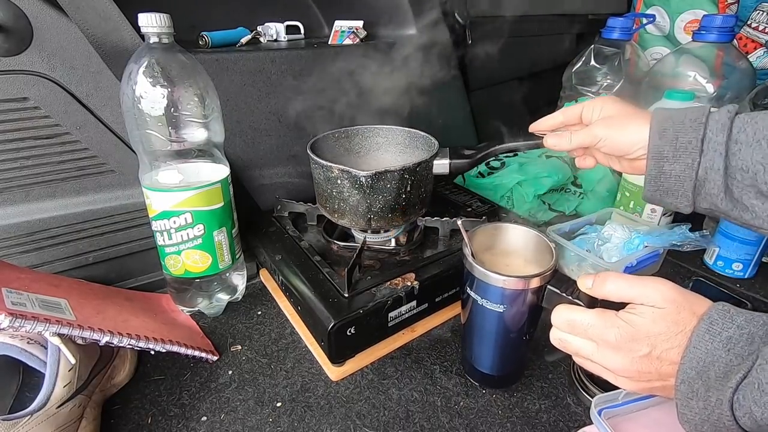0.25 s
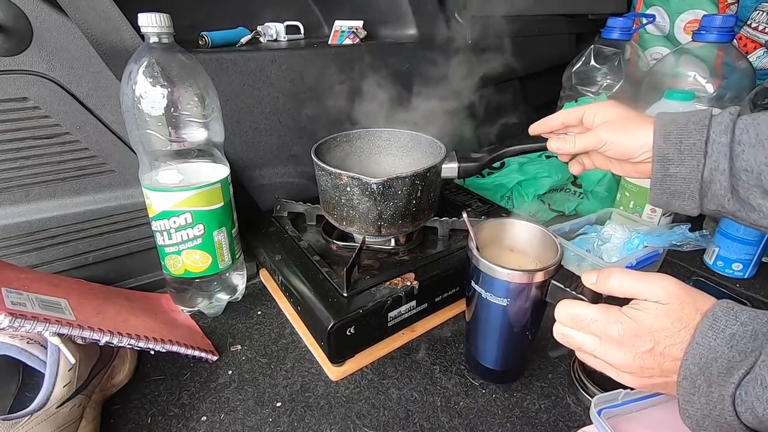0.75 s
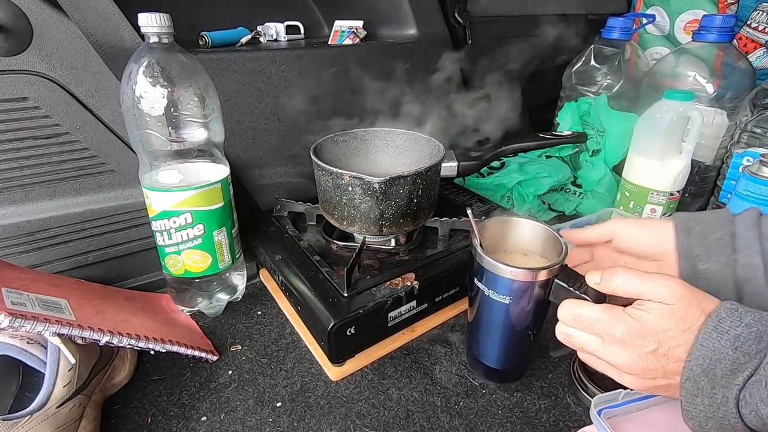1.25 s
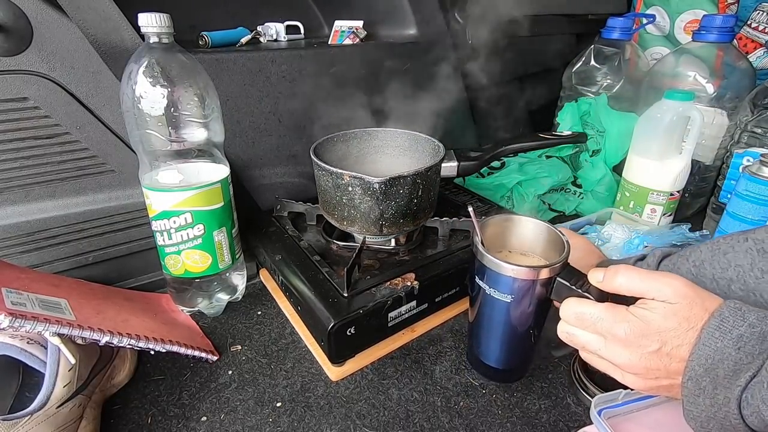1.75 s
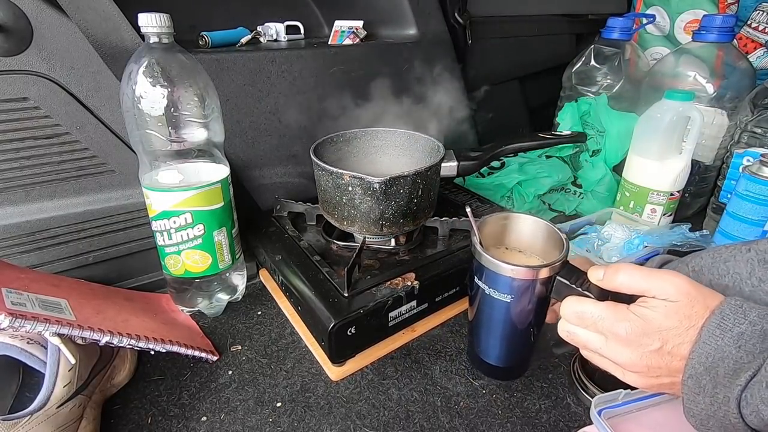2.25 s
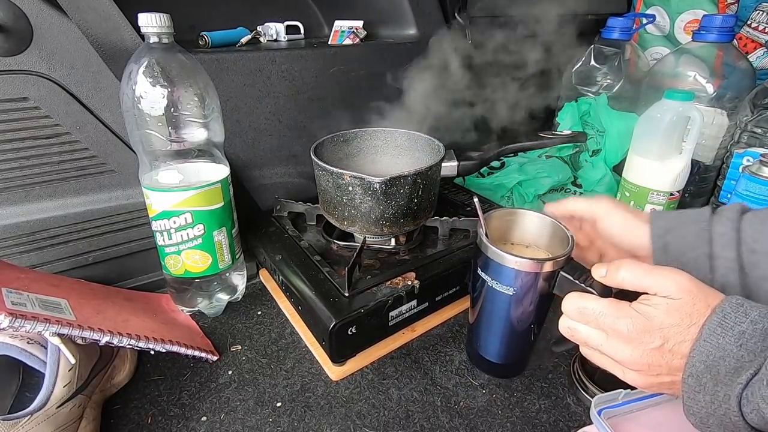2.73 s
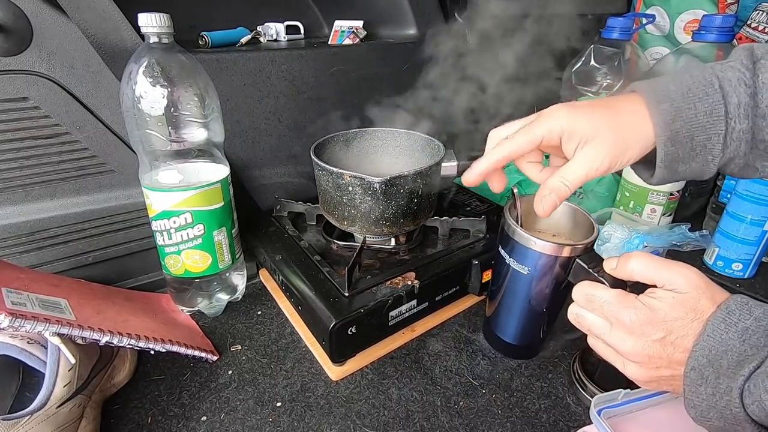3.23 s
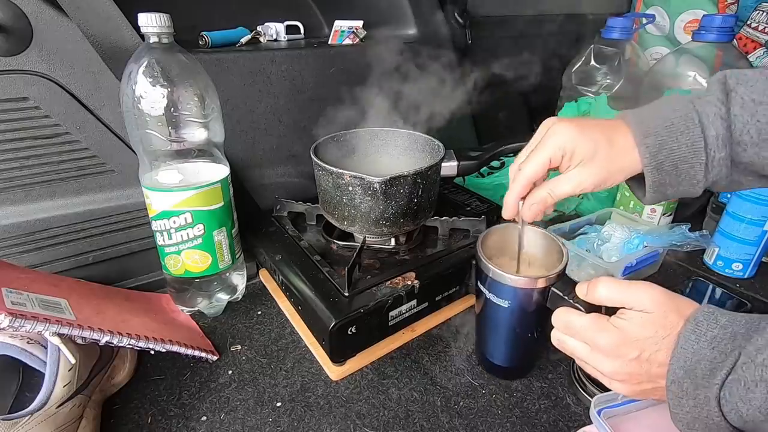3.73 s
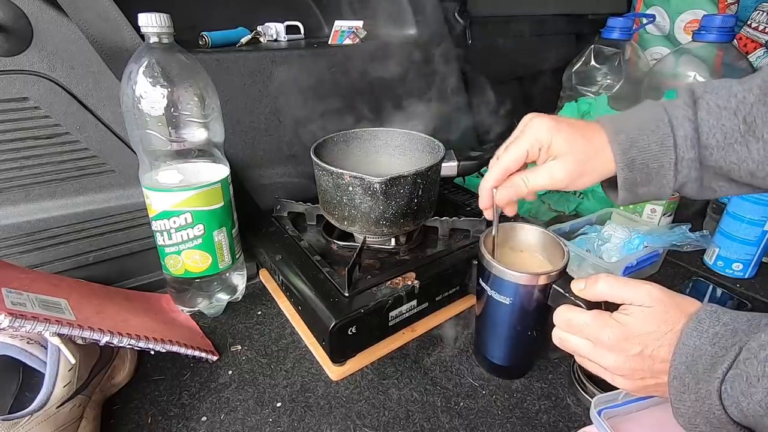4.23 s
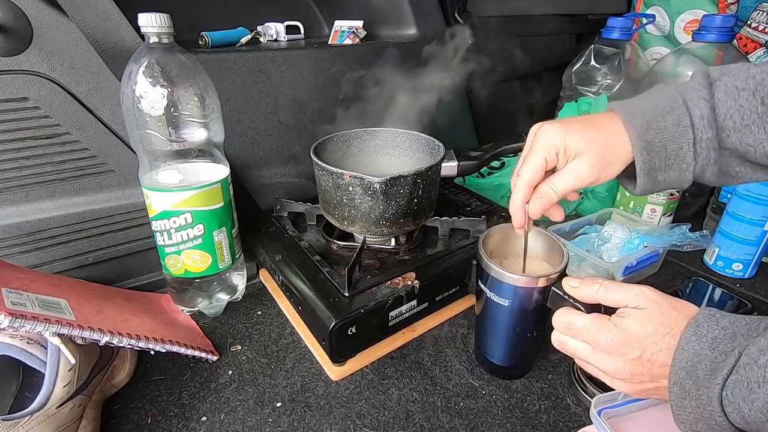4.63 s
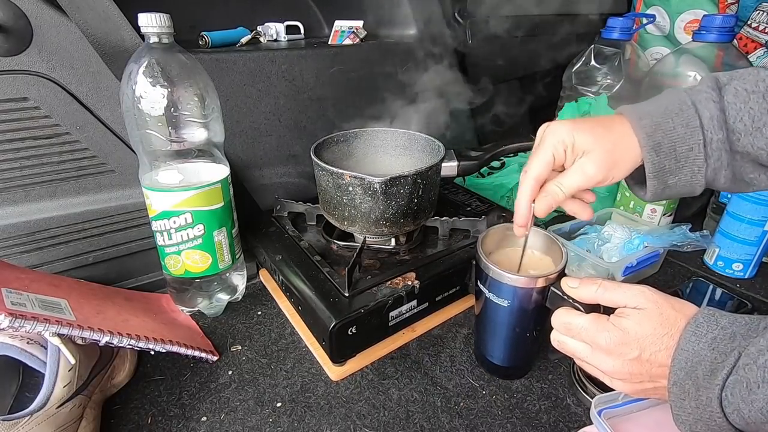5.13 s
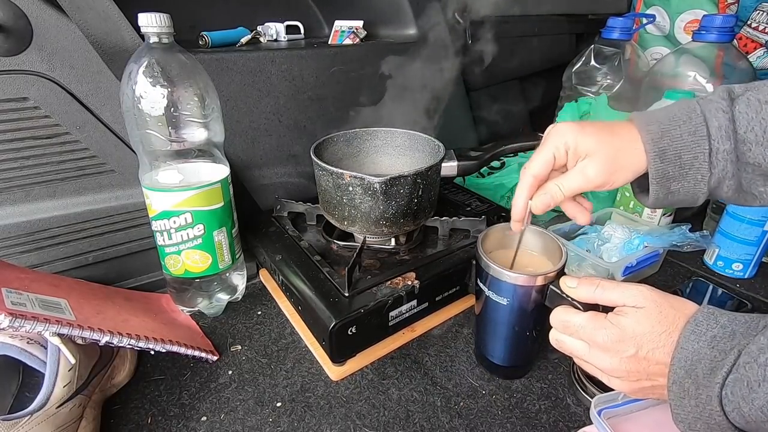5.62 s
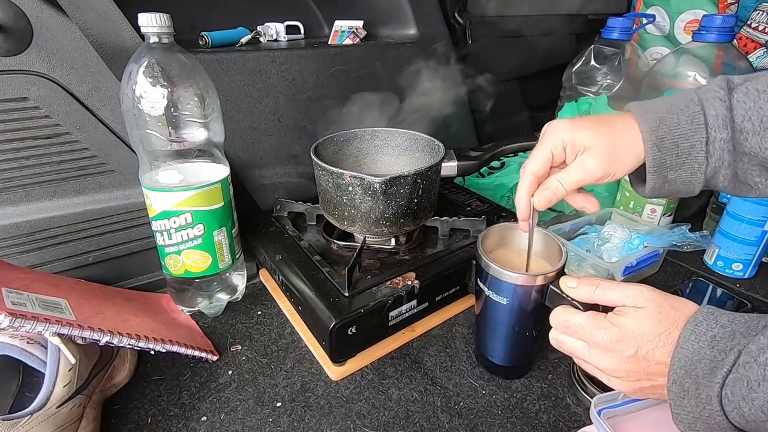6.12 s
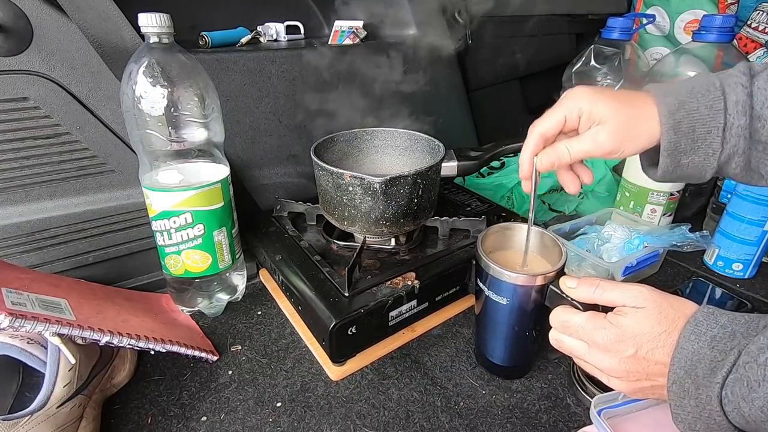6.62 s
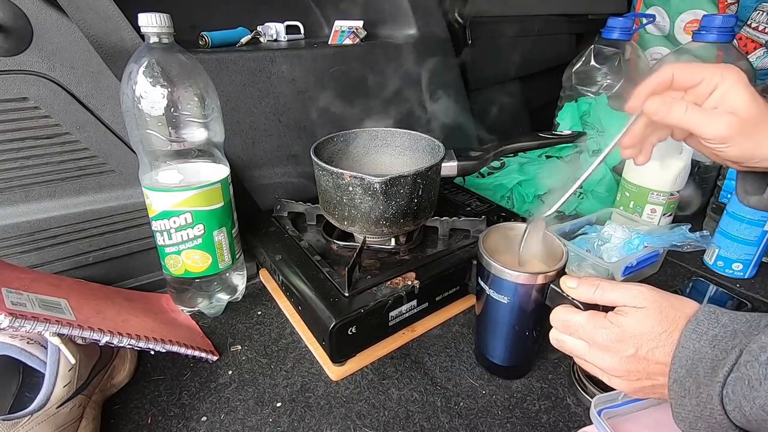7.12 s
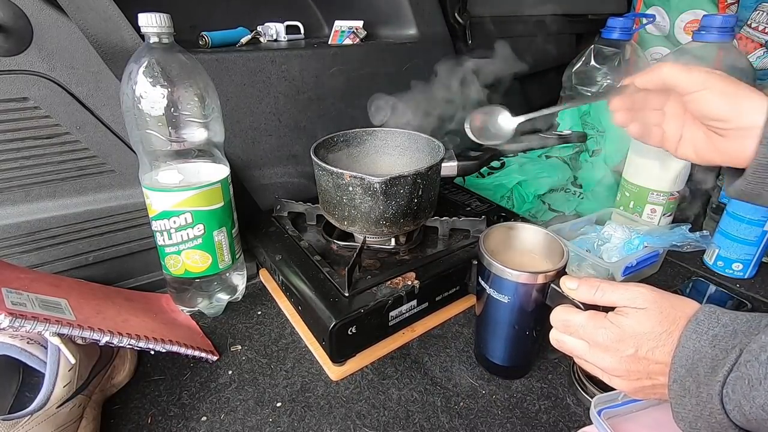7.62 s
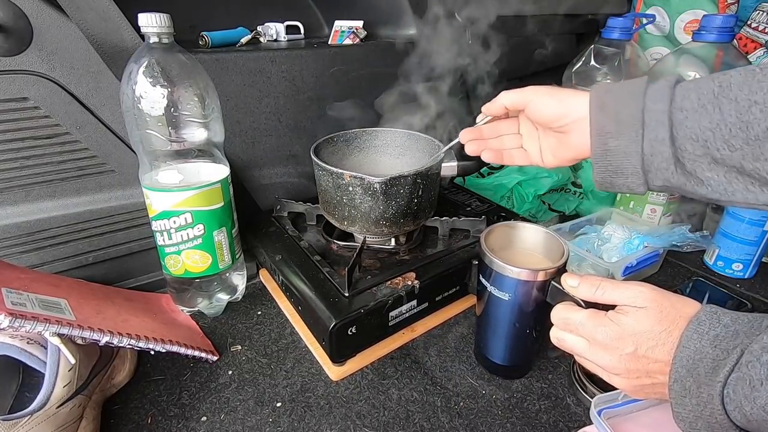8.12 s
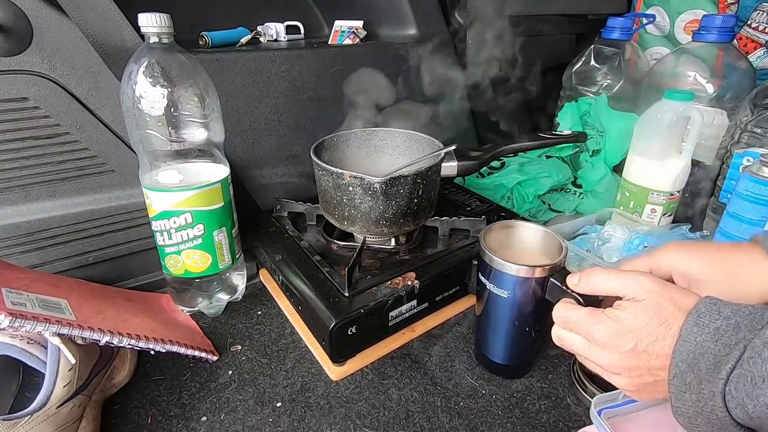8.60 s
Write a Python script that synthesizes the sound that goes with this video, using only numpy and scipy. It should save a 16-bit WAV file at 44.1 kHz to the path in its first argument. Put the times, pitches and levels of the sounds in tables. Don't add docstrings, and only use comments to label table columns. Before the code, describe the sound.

A hot pan rattles onto a stove grate, then a spoon stirs a full steel mug, taps its rim twice and clatters into the pan.

```python
import sys
import numpy as np
from scipy import signal
from scipy.io import wavfile

SR = 44100
rng = np.random.default_rng(int(sys.argv[2]) if len(sys.argv) > 2 else 0)


def boost_factor(decibels):
    exponent = np.asarray(decibels, float) / 20
    return 10 ** exponent


def store_pcm(level_fs):
    pcm = np.round(np.clip(level_fs, -1, 1) * 32767).astype(np.int16)
    wavfile.write(sys.argv[1], SR, np.atleast_2d(pcm).T)


N = 390711

# [t/s, level/dB]
HISS_LEVEL = [(0, -64.5), (1.1, -72.5), (2.15, -70), (2.399, -80), (2.5, -72.5), (3.251, -80.5),
              (3.781, -79), (4.1, -70), (6.85, -76.5), (6.95, -80), (7.978, -82), (8.04, -68.5),
              (8.2, -68.5), (8.7, -77)]
# [t/s, peak level/dB, brightness/dB, floor thump level/dB]
SETTLE = [(0.004, -23, -20, -33.5), (0.074, -71, 0.5, -70), (0.139, -64, 0, -67),
          (0.149, -21.5, -14.5, -70), (0.155, -12, -11.5, -58), (0.172, -23.5, -10.5, -35),
          (0.233, -11.5, -29, -32), (0.275, -17.5, -29, -25.5), (0.292, -22.5, -13, -60),
          (0.307, -33, -21, -60), (0.503, -38, -22.5, -74), (0.531, -25, -29.5, -70),
          (0.571, -9, -20.5, -39), (0.61, -29.5, -15, -35), (0.634, -30, -13, -60),
          (0.782, -14.5, -42, -56), (0.788, -28.5, -21, -70), (0.824, -26.5, -18, -33.5),
          (0.967, -54, -3, -80), (1.005, -14, -21.5, -39.5)]
# [t/s, peak level/dB, brightness/dB, floor thump level/dB]
BUMP = [
    (2.582, -9, 9.5, -48),
    (2.597, -7.5, 13, -43),
    (2.61, -20.5, -10.5, -39.5),
    (2.667, -18, 12.5, -36),
    (2.692, -27, -8, -42),
]
# [t/s, peak level/dB, f/Hz]
CLONK = [
    (0.157, -22.5, 1530),
    (0.233, -22.5, 1533),
    (1.007, -26, 1473),
    (8.29, -27, 927),
    (8.465, -10.5, 842),
]
# [t/s, peak level/dB, brightness/dB]
LAND = [
    (7.979, -60, 0.5),
    (7.99, -50.5, 0),
    (8.0, -19, 0),
    (8.11, -46, -7),
]
# [t/s, peak level/dB, brightness/dB]
LAY = [(8.163, -36, -6), (8.209, -27, -15), (8.263, -14.5, 12.5), (8.287, -10, 0.5), (8.362, -32, -15),
       (8.385, -31, -1), (8.463, -10.5, -10), (8.476, -32.5, 20), (8.533, -35.5, -5), (8.574, -40, -6),
       (8.802, -47.5, -9.5)]
# [t/s, peak level/dB, brightness/dB]
FIDGET = [
    (1.763, -44, -40),
    (1.926, -28.5, -0.5),
    (2.148, -17.5, -4),
    (2.188, -15.5, 7),
    (2.254, -48.5, 23.5),
    (3.074, -28.5, -37.5),
]
# [t/s, peak level/dB, brightness/dB]
GRIP = [
    (3.478, -56, 2.5),
    (3.486, -33, -7.5),
    (3.602, -34, -10.5),
]
# [t/s, peak level/dB, floor thump level/dB]
JOLT = [
    (3.815, -38, -40),
    (4.158, -26, -72),
    (5.253, -26, -55),
    (6.944, -54.5, -100.5),
]
# [t/s, peak level/dB, brightness/dB]
SNAG = [
    (3.83, -26, 1),
    (3.864, -28, 1),
    (3.906, -17, 15),
    (3.994, -24, 2),
    (4.011, -17, 0),
]
# [t/s, knock level/dB, wall note level/dB, wall note f/Hz]
STIR = [(4.392, -13, -39, 1380), (4.467, -19.5, -29, 1352), (4.683, -13, -21, 1406),
        (4.746, -20, -30, 1450), (4.967, -15, -23, 411), (5.022, -20.5, -32, 900), (5.289, -17, -23, 1180),
        (5.418, -15, -16, 1181), (5.725, -15.5, -23, 1284), (5.822, -14.5, -11, 1192),
        (6.135, -13.5, -21.5, 1243), (6.217, -16, -11.5, 1202), (6.491, -15.5, -23.5, 1220),
        (6.603, -13, -12.5, 1220)]
# [t/s, peak level/dB, brightness/dB]
GRAZE = [(4.093, -48.5, -0.5), (4.114, -54, 1), (4.134, -32, 4), (4.176, -39, 1.5), (4.24, -32, 8.5),
         (4.327, -49, -5.5), (4.606, -30, 13), (4.867, -34, 12.5), (4.915, -39, 8.5), (5.094, -29, 1),
         (5.136, -34, -3.5), (5.18, -33, -1), (5.222, -34.5, 0.5), (5.238, -27, -6), (5.774, -31, 8),
         (6.028, -39.5, 0), (6.457, -38, 10), (6.546, -37, 5.5)]
# [t/s, peak level/dB]
TAP = [
    (7.176, -41.5),
    (7.188, -27.5),
    (7.2, -1),
    (7.224, -17),
    (7.237, -18.5),
    (7.451, -40),
    (7.462, -26),
    (7.472, -3.5),
    (7.496, -15.5),
    (7.611, -49),
]
# [t/s, peak level/dB, f/Hz]
WALL_NOTE = [
    (3.485, -41, 1223),
    (3.602, -36.5, 1200),
    (6.945, -45.5, 1470),
    (7.1967, -22, 1266),
    (7.472, -9.5, 1424),
    (7.472, -16.5, 812),
]

SHUFFLE = [(.0, 0.0028, -55), (.19, 0.24, -57), (.52, 0.14, -52), (.8, 0.12, -61), (1.04, 0.0093, -64.5)]
HANDLE = [(2.07, 0.24, -63), (2.445, 0.068, -69.5), (3.14, 0.046, -57.5), (3.2, 0.059, -51),
          (3.47, 0.26, -74)]
DRAG = [(3.85, 0.28, -37), (3.97, 0.043, -36)]
SKID = [(3.825, 0.09, -42), (4.02, 0.021, -49.5)]
HUM = [(4.07, 0.072, -58), (4.18, .03, -68.5)]
SWIRL = [(4.13, 0.033, -56.5), (4.33, 0.52, -55), (4.65, 0.19, -53.5), (4.91, 0.41, -51.5),
         (5.26, 0.3, -53.5), (5.77, 0.21, -57), (6.17, 0.24, -56.5), (6.54, 0.14, -56), (6.72, 0.2, -54)]
SLIDE = [(8.19, 0.043, -60), (8.32, 0.21, -53.5), (8.49, 0.037, -62.5)]

HISS = [(240, -16), (400, -1.5), (860, -5.5), (972, -11.5), (2430, -12.5), (3620, -10.5), (9350, -19.5),
        (15500, -40.5)]
RUMBLE = [(18, -49), (30, -3), (59, -2.5), (107, -40), (158, 9), (424, -20), (500, -33.5), (650, -59.5)]
THUMP = [(15, -36), (25, -10), (54, 29), (86, 2), (110, -14), (140, -53)]
THUD = [(25, -6.5), (55, 8.5), (100, -21.5), (180, 12.5), (230, -13), (300, -49)]
GRATE = [(65, -25.5), (110, -5), (274, -10.5), (373, -1), (613, -9.5), (820, -0.5), (1240, 0.5), (1460, -1),
         (2400, -0.5), (2720, -1), (9630, -22.5), (15500, -70.5)]
BOWL = [(150, -74.5), (250, -38.5), (385, 3.5), (583, -22.5), (852, 8), (1160, -3.5), (1700, 5), (2020, -3),
        (5500, -0.5), (7380, -6.5), (15500, -44.5)]
TICK = [(150, -41), (250, -15.5), (635, -10.5), (837, -4), (1460, -2.5), (1670, -9.5), (3570, -7),
        (7640, -27), (15500, -100)]
CARPET = [(700, -38), (1100, 5), (2500, 0.5), (3400, 7), (4500, -12), (5500, 5.5), (7400, -23),
          (9200, -1.5), (11000, -43), (14500, -19), (15500, -40)]
BASE = [(28, -6), (60, -1), (183, -10), (271, 1), (395, 9), (800, -3), (1040, -57)]
KNOCK = [(110, -18), (160, -13.5), (565, -1.5), (1050, -6.5), (1210, -19), (1430, 12.5), (1760, -2),
         (3150, -3.5), (4120, -13), (9240, -17), (15500, -73.5)]
STEEL = [(130, -24), (200, 19), (313, -25), (654, 5), (1040, -0.5), (1490, 15), (2090, 3.5), (3250, 7.5),
         (4190, 8.5), (9540, -4), (15500, -73.5)]
RIM = [(150, -70.5), (250, -41), (405, -9), (1050, -7.5), (1200, 6), (1640, 0.5), (1950, -22), (2160, -6.5),
       (8470, -14), (15500, -59.5)]
# [f/Hz, likeness 0-1]
LIKENESS = [(40, 0.49), (90, 0.62), (250, 0.77), (1000, 0.75), (4000, 1), (8000, 0.17), (12000, 0.035)]

VENT = [(830, 1.8, 0.036), (1600, 6.5, 0.012), (3330, 1.1, 0.013), (3500, 1.4, 0.0089)]
STOVE = [(359, -4, 0.13), (839, 5, 0.098), (953, -4, 0.061), (1430, 3, 0.15), (1460, -13, 0.3),
         (1680, -5, 0.15), (2164, -8, 0.085), (2406, -20, 0.074), (2800, -18, 0.08), (2870, -23, 0.099),
         (3470, -2.5, 0.11), (3850, -6, .08), (3970, -12.5, 0.1)]
PAN = [(361, -10, .52), (651, -12, 1.5), (786, -14, .88), (996, -8, .46), (1109, -11, .75), (1297, -4, .37),
       (1480, -9, 1.1), (1494, -13, .7), (1647, -7, .4), (2530, -8, .35), (2918, -13, .5), (3540, -13, .47),
       (3810, -17, .7), (4608, -17, .9),
       (1825, -15, .35), (1960, -12, .35), (2089, -12, .35), (2213, -12, .4), (2374, -8, .19),
            (2589, -13, .35), (2961, -18, .3), (4620, -28, .6), (4823, -26, .64), (6008, -22, .73),
            (6864, -31, .67)]
PAN_FLOOR = [(361, -18, .3), (834, -18, .35), (1120, -16, .28), (1287, -2, .09), (1480, -6, .12),
             (1647, -18, .35), (2153, -13, .16), (2482, -4, .1), (2627, -15, .22), (3620, -2, .09),
             (3900, -5, .04), (5023, -6, .055), (5669, -6, .055), (6300, -9, .04)]
SPOON_IN_PAN = [(856, -6, .08), (1290, -8, .1), (1640, -6, .15), (2580, -6, .08), (2925, -7, .08),
                (3660, -7, .17), (4250, -8, .15), (4694, -5, .09), (5310, -5, .1), (5700, -8, .12),
                (6331, -10, .07), (7020, -11, .08), (7600, -12, .08)]
MUG_HELD = [(533, -2, .2), (1249, -6, .15), (1600, -12, .2), (2649, -1, .11), (3467, -6, .13),
            (3639, -8, .15), (4694, -5, .075), (5701, -4, .05)]
PILE = [(3467, -9.5, 0.0091), (5380, -15.5, 0.016), (9150, -16.5, 0.014)]
MUG_FULL = [(410, -12, .05), (565, -12, .07), (1626, -3, .1), (2140, -9, .08), (2550, -6, .09),
            (2640, -6, .12), (2826, -8, .1), (3160, -6, .08), (4683, -13, .07)]
DRINK = [(562, -12, .1), (790, -11, 0.13), (1210, -10, 0.14), (1500, -5.5, .1), (1635, -6, 0.25),
         (1875, -14.5, .1), (2246, -12, .07), (2480, -6.5, 0.069), (2674, -7.5, 0.083), (2786, -5.5, .1),
         (3205, -9.5, 0.1), (3310, -7.5, .12), (3750, -17.5, .06), (4500, -20.5, 0.071)]
RIM_FIRST = [(608, -10, .7), (786, -15, .9), (985, -3, .13), (1211, 5, .33), (1631, 3, .36), (2159, 5, .12),
             (2815, -4, .18), (2896, 8, .13), (3230, 2, .09), (3354, 2, .17), (4737, 4, .06),
             (5157, 2, .07), (8236, 0, .13)]
RIM_SECOND = [(603, -20, 0.8), (786, -14, 0.8), (980, -12, .23), (1222, -8, 0.24), (1550, -3, 0.35),
              (1631, -3, 0.48), (1728, -3, 0.28), (2099, -6, .17), (2595, -4, 0.18), (2837, -5, 0.19),
              (3343, -7, 0.24), (4780, 0, 0.07), (8247, 0, 0.12), (9641, -4, 0.075)]
FREE_AT_S = [
    2.7,
    7.205,
    7.48,
]

FROTH_GONE_S, HOLLOW_HZ, HOLLOW_DB = 5.1, 558, -7.5
EDGES = 24 * 2 ** np.arange(0, 9.4, 1 / 3)
CENTRES = np.sqrt(EDGES[1:] * EDGES[:-1])


def rms_one(x):
    return x / np.sqrt(np.mean(x ** 2) + 1e-20)


def placed(x, pan_db):
    return x * boost_factor([[pan_db / 2], [-pan_db / 2]])


def at_hz(points, hz):
    f, level = np.transpose(points)
    return np.interp(np.log(hz), np.log(f), level, left=level[0] - 30, right=level[-1])


def drift(rate, size):
    r = np.exp(-2 * np.pi * rate / SR)
    white = rng.standard_normal(size + 4000)
    return rms_one(signal.lfilter([1], [1, -2 * r, r * r], white)[4000:])


def stretched_drift(rate, size):
    return np.repeat(drift(rate, size // 10 + 1), 10)[:size]


def ring(push, hz, t60):
    r, w = boost_factor(-60 / (t60 * SR)), 2 * np.pi * hz / SR
    return signal.lfilter([0, np.sin(w)], [1, -2 * r * np.cos(w), r * r], push + 1e-18)


def noise_bank():
    white, bank = rng.standard_normal((2, 2, N)), []
    for k, hz in enumerate(CENTRES):
        band = signal.butter(2, EDGES[k:k + 2], "band", fs=SR, output="sos")
        mid, side = signal.sosfilt(band, white[k % 2])
        alike = np.clip(at_hz(LIKENESS, np.clip(hz, 40, 12000)), 0, .99)
        bank.append([np.sqrt(1 + alike) * mid + s * np.sqrt(1 - alike) * side for s in (1, -1)])
    return np.array(bank, dtype=np.float32) * np.sqrt(SR / 4)


def band_gains(spectrum):
    gain = boost_factor(at_hz(spectrum, CENTRES))
    return gain / np.sqrt(np.sum(gain ** 2 * np.diff(EDGES)))


def coloured(bank, spectrum):
    return np.einsum("b,bct->ct", band_gains(spectrum), bank)


def tilt(db, hz):
    return boost_factor(db * np.clip(np.log2(hz / 1500) / 2.39, 0, .9))


def blows(bank, rows, colour, floor, modes, rise, t60, crack_db, ring_db, tail_db, tail_t60, spread_db, pan_db,
          thump_t60=0.25):
    out = np.zeros((2, N + SR))
    u = np.arange(round(SR * np.clip(max(tail_t60, thump_t60), .2, .33))) / SR
    fall, pace = np.log(1000) * u, (CENTRES[:, None] / 1500) ** 0.22
    tail = boost_factor(tail_db) * np.exp(-fall * pace ** 2 / tail_t60)
    rattle = (np.exp(-fall * pace / t60) + tail) * (1 - np.exp(-u / rise))
    thump = band_gains(floor)[:, None] * (1 - np.exp(-u / 0.013)) * np.exp(-fall / thump_t60)
    usual = np.mean(np.array(rows)[:, 2])
    mode_hz = np.array(modes)[:, 0]
    start = round(rows[0][0] * SR)
    pushes = np.zeros((len(modes), round(rows[-1][0] * SR) - start + SR // 2))
    luck = rng.standard_normal((len(rows), len(modes)))
    for (s, db, bright_db, thump_db), odds in zip(rows, luck):
        i = round(s * SR)
        gains = band_gains(colour) * tilt(bright_db - usual, CENTRES)
        rough = boost_factor(db + crack_db + 1.6 * drift(170, len(u)))
        env = rattle * gains[:, None] * rough + boost_factor(thump_db - 3.5) * thump
        n = min(len(u), N - i)
        out[:, i:i + n] += np.einsum("bt,bct->ct", env[:, :n], bank[:, :, i:i + n])
        pushes[:, i - start + round(rise * SR)] += boost_factor(db + spread_db * odds) * tilt(bright_db - usual, mode_hz)
    for (hz, level_db, decay), push in zip(modes, pushes):
        out[:, start:start + len(push)] += boost_factor(ring_db + level_db) * ring(push, hz, decay)
    return placed(out[:, :N], pan_db)


def thumped(rows, thump_db):
    return [(*row, row[1] + thump_db) for row in rows]


def strokes(rows, rise_db, sag_db, fall_db):
    t = np.clip(np.arange(rows[0][0] - .12, sum(rows[-1][:2]) + .15, .002), 0, None)
    levels = []
    for s, length, db in rows:
        rising = rise_db * np.clip(s - t, 0, None)
        sagging = sag_db * np.clip(t - s, 0, None)
        falling = fall_db * np.clip(t - s - length, 0, None)
        levels.append(db - rising - sagging - falling)
    return t, np.max(levels, axis=0)


def rub(bank, s, db, colour, modes, ring_db, rough_db, patchy_db, pan_db, wander=0.01, flutter_db=3.5):
    out, i, j = np.zeros((2, N)), round(s[0] * SR), round(s[-1] * SR)
    n = j - i
    level = np.interp(np.arange(i, j) / SR, s, db)
    stroke = boost_factor(level + rough_db * drift(87, n)) * signal.windows.tukey(n, .04)
    patches = boost_factor([patchy_db * stretched_drift(310, n) for hz in CENTRES])
    out[:, i:j] = np.einsum("bt,bct->ct", band_gains(colour)[:, None] * patches * stroke, bank[:, :, i:j])
    for hz, level_db, t60 in modes:
        flutter = boost_factor(level_db + flutter_db * stretched_drift(160, n)) * rng.standard_normal((2, n))
        turn = 2 * np.pi * hz / SR * np.cumsum(1 + wander * stretched_drift(60, n))
        slow = signal.lfilter([1], [1, -boost_factor(-60 / (0.55 * t60 * SR))], flutter * stroke)
        sung = slow[0] * np.sin(turn) + slow[1] * np.cos(turn)
        out[:, i:j] += boost_factor(ring_db) * sung / np.sqrt(t60 * SR / 30)
    return placed(out, pan_db)


def notes(rows, swell, t60, pan_db):
    out, u = np.zeros(N), np.arange(SR // 4) / SR
    shape = (1 - np.exp(-u / swell)) * boost_factor(-60 * u / t60 - 900 * u ** 2 / t60)
    for s, db, hz in rows:
        out[round(s * SR):][:len(u)] += boost_factor(db) * shape * np.sin(2 * np.pi * hz * u)
    return placed(out, pan_db)


def clang(s, modes, db, pan_db):
    out, u = np.zeros(N), np.arange(SR) / SR
    for hz, level_db, t60 in modes:
        out[round(s * SR):][:SR] += boost_factor(db + level_db - 60 * u / t60) * np.sin(2 * np.pi * (hz * u + rng.random()))
    fade_in = np.clip((np.arange(N) / SR - s) / 0.00342, 0, 1)
    return placed(out * fade_in, pan_db)


def background(bank):
    s, hiss_db = np.transpose(HISS_LEVEL)
    level = np.interp(np.arange(N) / SR, s, hiss_db)
    hiss = coloured(bank, HISS)
    for hz, level_db, t60 in VENT:
        hiss += boost_factor(level_db - 8.5) * rms_one(ring(rng.standard_normal((2, N)), hz, t60))
    hiss *= boost_factor(level + 1.6 * drift(5.3, N))
    rumble_db = -70.5 + 1.6 * (level + 73.5)
    return hiss + coloured(bank, RUMBLE) * boost_factor(rumble_db + 0.78 * drift(11.0, N))


def cabin(x):
    t60, echo_db = 0.11, -11
    t = np.arange(SR // 5) / SR
    echo = signal.lfilter([1, -1], [1, -1.5, .55], rng.standard_normal((2, len(t))))
    echo *= np.exp(-np.log(1000) * t / t60) * (t > .002)
    echo /= np.sqrt(np.sum(echo ** 2, axis=1, keepdims=True))
    return x + boost_factor(echo_db) * signal.oaconvolve(x, echo, axes=1)[:, :N]


def handling(bank):
    out = blows(bank, thumped(FIDGET, -34), TICK, THUD, STOVE, rise=0.0021, t60=0.06, crack_db=-14, ring_db=-37,
                tail_db=-16.5, tail_t60=0.17, spread_db=7.7, pan_db=-0.33)
    out += rub(bank, *strokes(HANDLE, 700, 27, 360), TICK, MUG_FULL, ring_db=-15, rough_db=1, patchy_db=3.7,
               pan_db=-1.4)
    out += blows(bank, thumped(GRIP, -47), TICK, THUD, MUG_HELD, rise=0.001045, t60=0.03, crack_db=-11.5,
                 ring_db=-14.5, tail_db=-4.5, tail_t60=0.11, spread_db=1.2, pan_db=-2)
    return out


def pan_on_stove(bank):
    out = blows(bank, SETTLE, GRATE, THUMP, STOVE, rise=0.0042, t60=0.015, crack_db=-12, ring_db=-22.5,
                tail_db=-2.3, tail_t60=0.16, spread_db=2.7, pan_db=0.92)
    out += notes(CLONK, swell=0.0049, t60=0.16, pan_db=2.4)
    out += rub(bank, *strokes(SHUFFLE, 310, 40, 460), GRATE, STOVE, ring_db=2, rough_db=0.87, patchy_db=0.62,
               pan_db=0.91)
    out += blows(bank, BUMP, GRATE, THUMP, STOVE, rise=0.0061, t60=0.16, crack_db=-9.5, ring_db=-25,
                 tail_db=-37, tail_t60=0.89, spread_db=6.4, pan_db=.6, thump_t60=0.34)
    return out + clang(FREE_AT_S[0], PAN, -36.5, 0.33)


def spoon_in_pan(bank):
    out = blows(bank, thumped(LAND, -24.5), GRATE, THUMP, PAN_FLOOR, rise=0.002, t60=0.077, crack_db=-13.5,
                ring_db=-10, tail_db=-11, tail_t60=0.25, spread_db=0.84, pan_db=1, thump_t60=0.28)
    out += blows(bank, thumped(LAY, -40), BOWL, THUMP, SPOON_IN_PAN, rise=0.00098, t60=0.039, crack_db=-9,
                 ring_db=-23.5, tail_db=-9, tail_t60=0.19, spread_db=2.9, pan_db=0.86)
    out += rub(bank, *strokes(SLIDE, 400, 45, 240), BOWL, SPOON_IN_PAN, ring_db=3.5, rough_db=4.2, patchy_db=2.1,
               pan_db=2.3, wander=0.001, flutter_db=3.9)
    return out


def mug_dragged(bank):
    out = rub(bank, *strokes(DRAG, 530, 16, 470), CARPET, PILE, ring_db=0.5, rough_db=2.1, patchy_db=1.7, pan_db=-2.6)
    out += rub(bank, *strokes(SKID, 1100, 2.3, 550), BASE, [], ring_db=0, rough_db=5, patchy_db=1.3, pan_db=-1.3)
    out += blows(bank, thumped(SNAG, -42), CARPET, THUD, PILE, rise=0.001, t60=0.018, crack_db=-6, ring_db=-17.5,
                 tail_db=-26, tail_t60=0.1, spread_db=2, pan_db=-2.6)
    out += rub(bank, *strokes(HUM, 400, 25, 400), BASE, [(HOLLOW_HZ, 0, .3)], ring_db=10.8, rough_db=1.3,
               patchy_db=1.1, pan_db=-2.4, flutter_db=2.1)
    return out


def mug_knocked(bank):
    upper_hz, upper_db = 1542, -8.5
    stand_hz, stand_db = 167, -19.5
    jolts = [(s, db, 0, thump) for s, db, thump in JOLT]
    knocks = sorted(jolts + thumped([(s, db, 0) for s, db, *note in STIR], -25))
    wall = [(s, db, hz) for s, knock, db, hz in STIR] + WALL_NOTE
    wall += [(s, db + upper_db, upper_hz) for s, knock, db, hz in STIR if s > FROTH_GONE_S]
    hollow = [(s, db + HOLLOW_DB, HOLLOW_HZ) for s, db, *note in STIR if s < FROTH_GONE_S]
    rocking = [(s, stand_db + db / 2, stand_hz) for s, db, *rest in knocks[1:-1]]
    out = blows(bank, knocks, KNOCK, THUD, MUG_FULL, rise=0.002347, t60=0.031, crack_db=-5.5, ring_db=-21,
                tail_db=-21.5, tail_t60=0.17, spread_db=3.8, pan_db=-2.1, thump_t60=0.16)
    out += notes(wall, swell=0.0032, t60=0.074, pan_db=-3.5)
    out += notes(hollow, swell=0.0054, t60=0.056, pan_db=-2.5)
    return out + notes(rocking, swell=0.016, t60=0.094, pan_db=-1.5)


def mug_stirred(bank):
    lift_s, lift_db_per_s = 6.905, 900
    out = blows(bank, thumped(GRAZE, -38), STEEL, THUD, DRINK, rise=0.002, t60=0.011, crack_db=-12, ring_db=-18.5,
                tail_db=-23, tail_t60=0.066, spread_db=5.9, pan_db=-1.9)
    s, db = strokes(SWIRL, 190, 31, 176)
    db = db - lift_db_per_s * np.clip(s - lift_s, 0, None)
    out += rub(bank, s, db, STEEL, DRINK, ring_db=2.93, rough_db=1.8, patchy_db=5.1, pan_db=-1.7,
               wander=0.025, flutter_db=5.44)
    return out


def rim_tapped(bank):
    taps = thumped([(s, db, 0) for s, db in TAP], -38.5)
    out = blows(bank, taps, RIM, THUD, MUG_FULL, rise=0.0018, t60=0.034, crack_db=-7.5, ring_db=-31.5,
                tail_db=-39.5, tail_t60=0.35, spread_db=2.4, pan_db=-2.6)
    out += clang(FREE_AT_S[1], RIM_FIRST, -38.5, -5.5)
    return out + clang(FREE_AT_S[2], RIM_SECOND, -38.0, -5.5)


def scene():
    bank = noise_bank()
    stove = pan_on_stove(bank) + spoon_in_pan(bank)
    mug = mug_dragged(bank) + mug_knocked(bank) + mug_stirred(bank) + rim_tapped(bank)
    return cabin(handling(bank) + stove + mug) + background(bank)


def band_limit(x):
    return signal.sosfilt(signal.butter(12, 15810, fs=SR, output="sos"), x)


def record(dry):
    cut = signal.cheby2(10, 60, 16150, fs=SR, output="sos")
    mix = signal.sosfilt(cut, dry)
    return band_limit(mix)


dry = scene()
out = record(dry)
store_pcm(out)
```